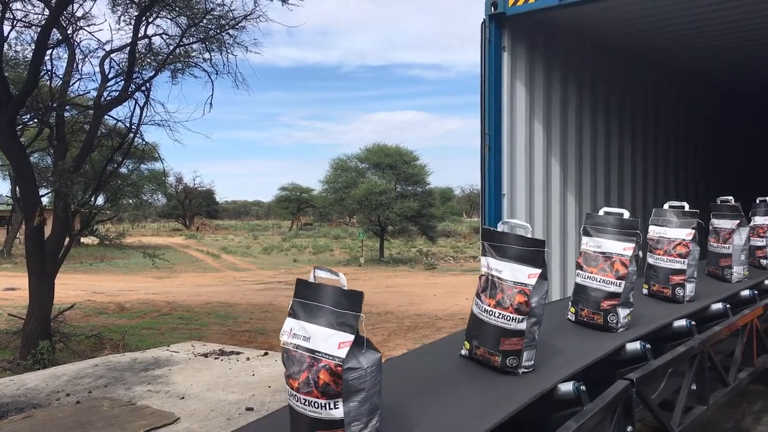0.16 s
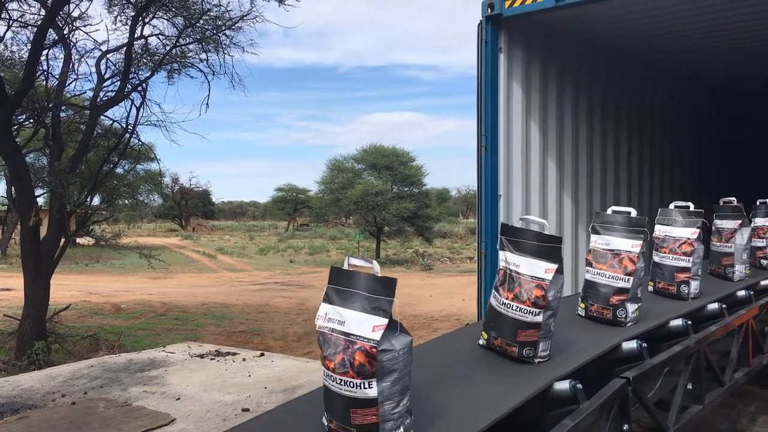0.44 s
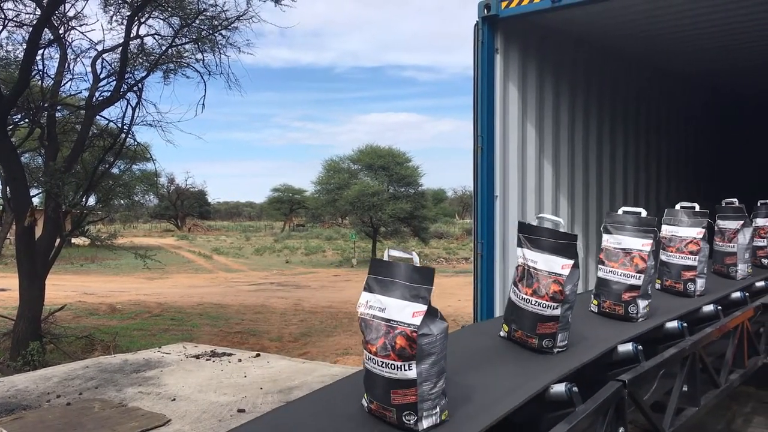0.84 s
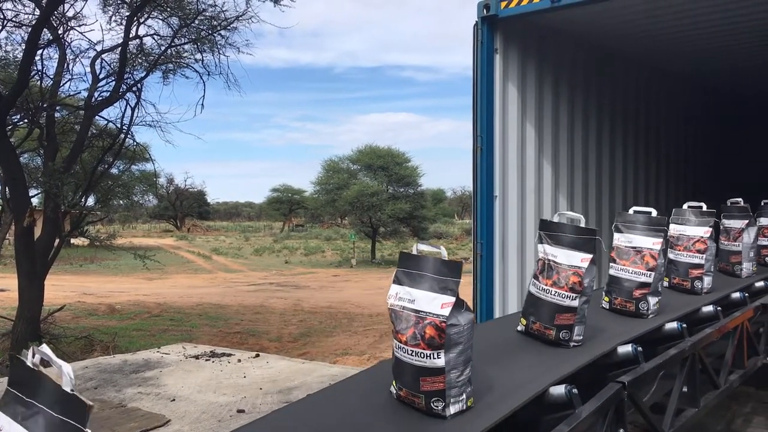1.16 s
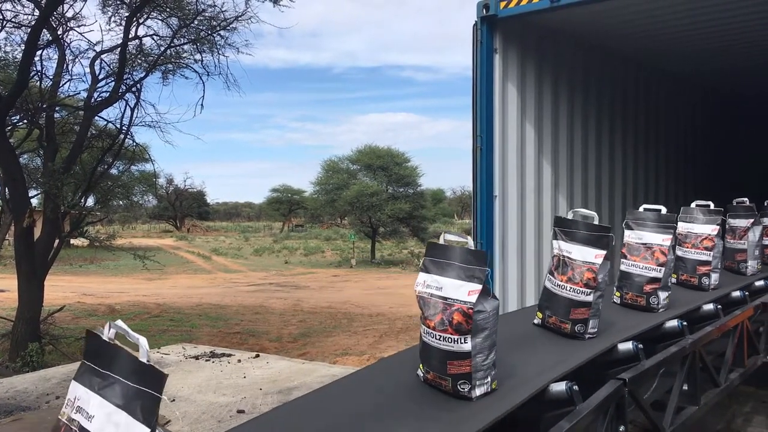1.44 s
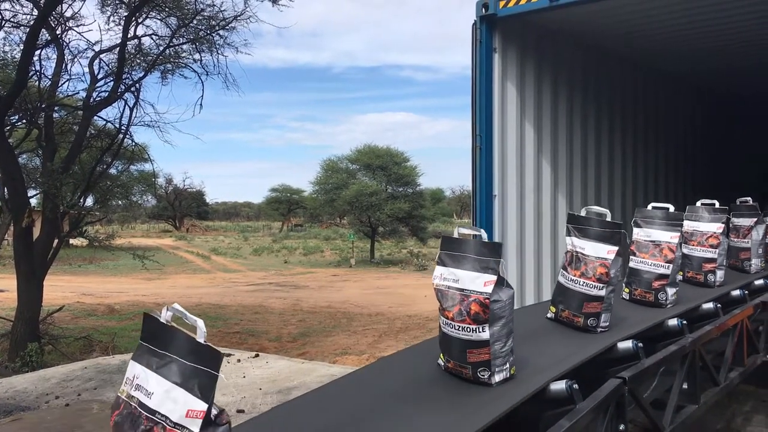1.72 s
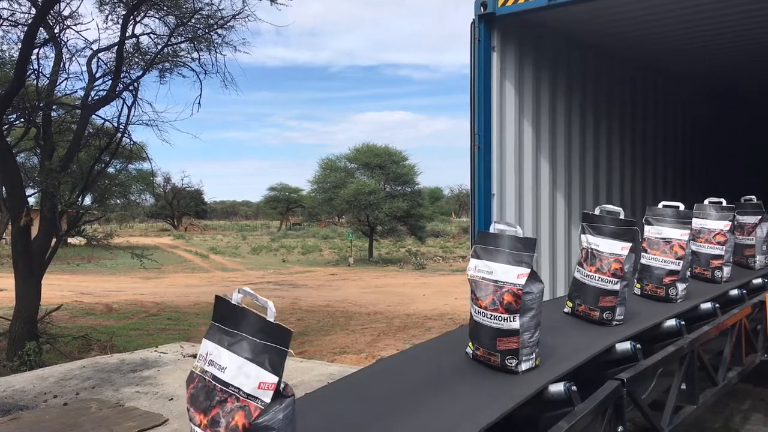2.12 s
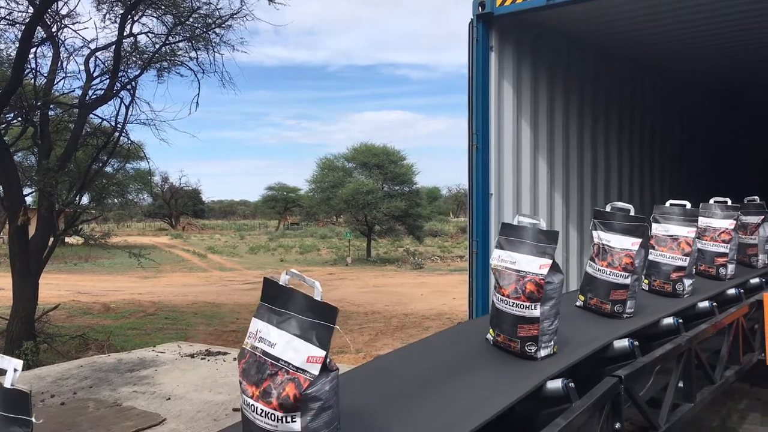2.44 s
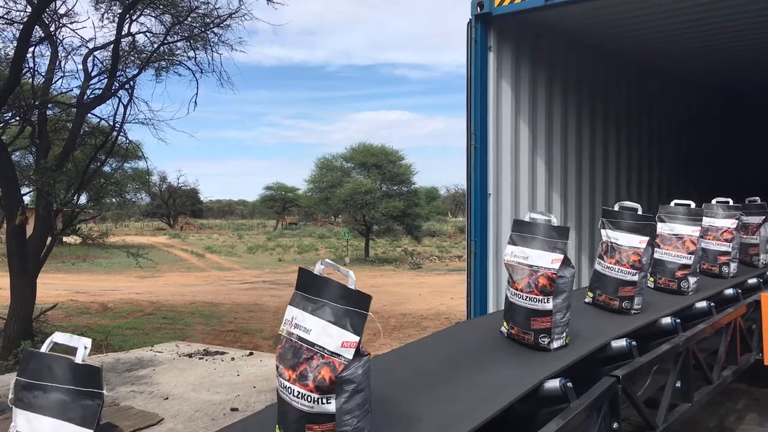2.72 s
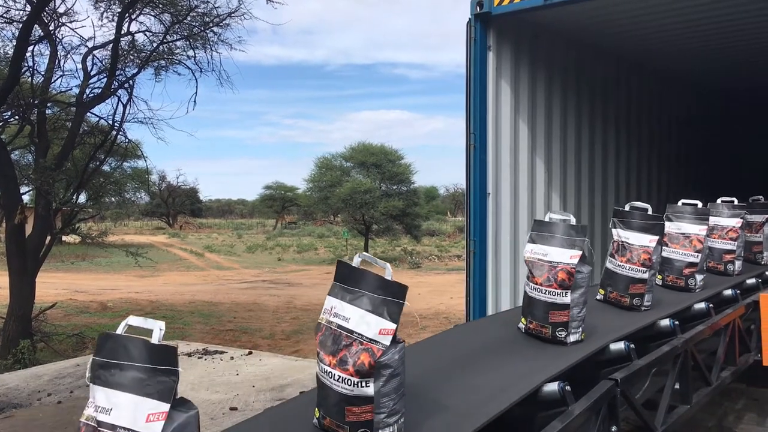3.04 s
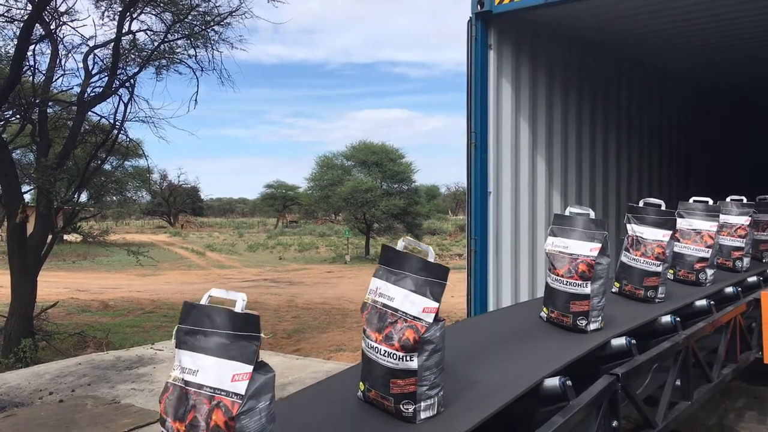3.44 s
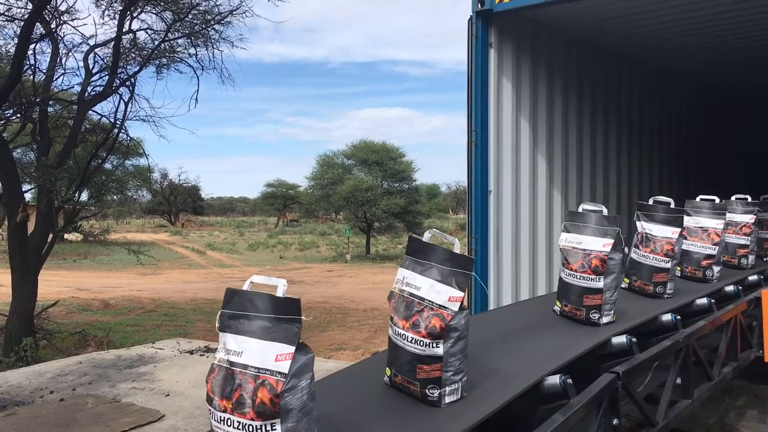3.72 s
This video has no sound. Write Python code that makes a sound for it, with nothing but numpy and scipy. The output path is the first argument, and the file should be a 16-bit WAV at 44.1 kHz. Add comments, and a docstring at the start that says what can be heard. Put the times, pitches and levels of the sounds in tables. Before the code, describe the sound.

A conveyor belt runs outdoors with a steady motor hum and roller rumble, heard from close beside it. Paper sacks of charcoal repeatedly rustle, crunch and knock on the belt, scraping along near the start and again near the end.

```python
"""Charcoal sacks on a conveyor

A belt carries paper sacks of charcoal at the mouth of a steel shipping container, outdoors.
Its motor hums and buzzes at twice the mains rate over the rumble of belt and rollers,
and one roller rubs on every turn. Sacks land, rustle and crunch with a short ring of the
container, knock on the belt, and twice scrape along."""
import sys
import numpy as np
from scipy import signal
from scipy.fft import rfft, irfft
from scipy.io import wavfile

SR = 44100
rng = np.random.default_rng(int(sys.argv[2]) if len(sys.argv) > 2 else 0)


def wrap_up_sound(samples):
    """Save the sound to the file named by the first command line argument, as 16-bit audio."""
    columns = np.atleast_2d(samples).T
    # keep every value between -1 and 1, then stretch to whole-number steps
    tamed = np.clip(columns, -1, 1)
    steps = np.round(tamed * 32767).astype(np.int16)
    wavfile.write(sys.argv[1], SR, steps)


N = 170667
TIME = np.arange(N) / SR


def from_db(db):
    """Turn decibels into a factor to multiply a sound by."""
    return 10 ** (np.asarray(db) / 20)


def rms_one(x):
    """Scale a signal so that its average strength (rms) is 1."""
    return x / np.sqrt(np.mean(x ** 2) + 1e-20)


def colour(x, spectrum):
    """Shape a noise's tone by rows of f/Hz, relative level/dB; the result has strength 1."""
    hz, db = np.transpose(spectrum)
    bins = np.maximum(np.fft.rfftfreq(N, 1 / SR), 1)
    gain = from_db(np.interp(np.log(bins), np.log(hz), db))
    return rms_one(irfft(rfft(x) * gain, N))


def drift(rate_hz):
    """A random wander of typical size 1, mostly slower than rate_hz."""
    step, warm_up = 40, 2000  # samples per point, points thrown away
    r = np.exp(-2 * np.pi * rate_hz * step / SR)
    noise = rng.standard_normal(N // step + warm_up + 2)
    slow = signal.lfilter([1], [1, -2 * r, r * r], noise)[warm_up:]
    return np.interp(np.arange(N) / step, np.arange(len(slow)), rms_one(slow))


def resonate(x, hz, width_hz):
    """Keep a band around one pitch, filtering twice for steep edges; the result has strength 1."""
    r = np.exp(-np.pi * 1.5 * width_hz / SR)
    section = [1, 0, -1, 1, -2 * r * np.cos(2 * np.pi * hz / SR), r * r]
    return rms_one(signal.sosfilt([section, section], x))


def swell(start, rise, fade):
    """Rise straight to 1, then die away by 60 dB every `fade` seconds."""
    age = TIME - start
    return np.clip(age / rise, 0, 1) * np.exp(-np.log(1000) * np.maximum(age - rise, 0) / fade)


def grains(snaps_per_s=6000, spread_db=2.5, echo_fade_s=0.17, echo_db=-4.5):
    """A gritty noise: many tiny snaps of uneven size, blurred by echoes from the steel walls."""
    sizes = from_db(spread_db * np.minimum(rng.exponential(1, N), 5)) * rng.choice([-1, 1], N)
    snaps = sizes * (rng.random(N) < snaps_per_s / SR)
    tail = rng.standard_normal(N) * np.exp(-np.log(1000) * TIME / echo_fade_s)
    echoes = irfft(rfft(snaps) * rfft(tail / np.linalg.norm(tail)), N)
    wash = from_db(-2.5) * rng.standard_normal(N)  # snaps too small to tell apart
    return rms_one(snaps + from_db(echo_db) * echoes) + wash


def motor(hum_hz=100.03, throb_depth=0.47):
    """Mains power makes the motor hum and shakes its housing into a buzz once per hum cycle."""
    # tones of the hum: multiple of the hum rate, level/dB
    hum_tones = [(.5, -68), (1, -36.5), (2, -49.5), (3, -57)]
    # bands where the housing rings: f/Hz, width/Hz, level/dB
    housing_bands = [(1477, 300, -54.5), (2047, 290, -53), (3155, 200, -58.5), (5600, 750, -74)]
    phase = 2 * np.pi * hum_hz * TIME + 0.033 * drift(2)
    out = 0
    for multiple, db in hum_tones:
        waver_db = -0.1 if multiple == 1 else 1.7  # the main tone is nearly steady
        out += np.sqrt(2) * from_db(db + waver_db * drift(2.3)) * np.cos(multiple * phase)
    throb = 1 + throb_depth * np.sin(phase)
    for hz, width_hz, db in housing_bands:
        gain = from_db(db + 2.0 * drift(6.8))
        out += gain * resonate(throb * rng.standard_normal(N), hz, width_hz)
    return out


def belt(rumble_db=-42, rollers_db=-45.5, flutter_db=1.36):
    """The running belt rumbles, and the rollers turning under it make a fluttering rush."""
    # tone of the belt's rumble: f/Hz, relative level/dB
    rumble_spectrum = [(20, -46), (32, -21), (40, -19), (50, 8), (70, -2.5), (95, 3.5), (125, -6),
                       (200, -7), (290, -9), (400, -21), (800, -41.5)]
    # tone of the rollers: f/Hz, relative level/dB
    roller_spectrum = [(150, -0.5), (390, 0.5), (480, 1), (700, 0), (950, 0.5), (1150, -1), (2200, -1.5),
                       (2700, -5), (4000, -9.5), (6200, -13), (8000, -20), (9600, -20.5), (12500, -26),
                       (16000, -39)]
    rumble = from_db(rumble_db) * colour(rng.standard_normal(N), rumble_spectrum)
    rush = from_db(rollers_db + flutter_db * drift(11.3)) * colour(grains(), roller_spectrum)
    return rumble + rush


def sacks():
    """Each movement of a sack crumples the paper and shifts the charcoal inside."""
    # a sack lands or shifts: start/s, rise/s, rustle level/dB, crunch level/dB, fade/s
    movements = [(0, 0.018, -57, -50.5, 3.7), (0.295, 0.032, -40.5, -37.5, 0.4),
                 (0.414, 0.0087, -39.5, -41.5, .33), (.472, 0.013, -48.5, -54, 1.1),
                 (.645, 0.025, -44, -39.5, 0.78), (.776, .011, -39, -39.5, .32),
                 (.857, 0.012, -44.5, -42.5, 0.34), (1.048, 0.014, -50.5, -74, .3),
                 (1.122, 0.017, -37.5, -37.5, 0.24), (1.168, 0.026, -43.5, -40, 0.28),
                 (1.42, 0.11, -49.5, -46, 0.97), (1.665, 0.0047, -50, -66, 0.41),
                 (1.778, .008, -50, -47, 0.22), (1.902, 0.012, -49.5, -42.5, 0.64),
                 (1.962, .007, -41, -42.5, 0.37), (1.984, 0.018, -39.5, -38, 0.29),
                 (2.22, 0.071, -44.5, -42.5, 0.57), (2.282, 0.02, -41, -38.5, 0.3),
                 (2.35, 0.023, -51, -41, 0.17), (2.48, 0.027, -54.5, -48.5, 0.68),
                 (2.582, 0.011, -52, -49, 2.4), (2.75, 0.014, -38.5, -37, 0.29),
                 (3.025, .009, -48, -60, 0.18), (3.11, .015, -39.5, -38.5, 0.35),
                 (3.338, 0.051, -43.5, -36, 0.4), (3.42, 0.022, -41, -37.5, 0.22),
                 (3.697, .01, -43.5, -38.5, 0.63), (3.797, .01, -39, -37.5, 0.24)]
    # tone of rustling paper: f/Hz, relative level/dB
    paper_spectrum = [(800, -22), (2500, -7), (3600, 2), (6200, 3), (8000, -2.5), (9600, 0), (12500, -2.5),
                      (16000, -7.5)]
    # tone of crunching charcoal: f/Hz, relative level/dB
    charcoal_spectrum = [(70, -1), (180, -11), (320, 0), (480, 0.5), (1400, -0.5), (2200, -1.5), (2800, -7),
                         (4000, -11), (7000, -36), (16000, -47)]
    paper_power, charcoal_power = 0, 0
    for start, rise, rustle_db, crunch_db, fade in movements:
        shape = swell(start, rise, fade)
        paper_power += (from_db(rustle_db) * shape) ** 2
        charcoal_power += (from_db(crunch_db) * shape) ** 2
    rustle = np.sqrt(paper_power) * colour(grains(), paper_spectrum)
    crunch = np.sqrt(charcoal_power) * colour(grains(), charcoal_spectrum)
    return rustle + crunch


def roller_rub(first_s=0.04, turn_s=0.13, half_length_s=0.012, scatter_db=2.8):
    """One roller rubs once a turn, giving a short gritty chirp each time."""
    # strength of the rubbing: t/s, level/dB
    rub_levels = [(0, -59), (1.7, -55), (2.1, -46.5), (2.4, -45.5), (2.9, -46), (3.2, -62), (3.87, -57)]
    times = np.arange(first_s, N / SR, turn_s)
    rub_db = np.interp(times, *np.transpose(rub_levels)) + scatter_db * rng.standard_normal(len(times))
    pressure = 0
    for t, db in zip(times, rub_db):
        pressure += from_db(db) * np.exp(-.5 * ((TIME - t) / half_length_s) ** 2)
    return pressure * resonate(rng.standard_normal(N), hz=2050, width_hz=360)


def scrape():
    """Sacks slide with a gritty, uneven friction that makes belt and frame rasp and groan."""
    # strength of the sliding: t/s, level/dB
    slide_levels = [(0, -51.5), (.36, -47.5), (.53, -38.5), (.63, -39), (.76, -43.5), (.95, -44.5),
                    (1.12, -44), (1.3, -70), (3.2, -50), (3.345, -44.5), (3.41, -43), (3.54, -36.5),
                    (3.72, -39.5), (3.87, -40.5)]
    # tone of the sliding: f/Hz, relative level/dB
    slide_spectrum = [(100, -16), (200, 3), (300, 0), (450, -1), (700, -1.5), (1500, -2.5), (2250, -0.5),
                      (2750, -7.5), (3800, -9.5), (6200, -15.5), (8000, -22.5), (10000, -25.5),
                      (16000, -34)]
    # rasps and groans: start/s, rise/s, fade/s, f/Hz, width/Hz, level/dB
    rasps = [(.41, 0.013, 0.31, 2140, 200, -42), (.46, 0.1, 1.4, 3300, 1700, -45),
             (.49, 0.048, 1.06, 201, 129, -40.5), (.648, 0.033, 0.23, 860, 1210, -37),
             (3.31, 0.097, 1.3, 201, 182, -40), (3.47, 0.036, .7, 2250, 260, -42),
             (3.49, 0.14, 1.4, 247, 89, -37.5)]
    level_db = np.interp(TIME, *np.transpose(slide_levels)) + .6 * drift(22)
    friction = grains()
    ringing = 0
    for start, rise, fade, hz, width_hz, db in rasps:
        ringing += from_db(db) * swell(start, rise, fade) * resonate(friction, hz, width_hz)
    return from_db(level_db) * colour(grains(), slide_spectrum) + ringing


def knocks(rise_s=0.0017):
    """A sack's weight hits the belt, and belt and frame ring with a few dull, low tones."""
    # blows on the belt: t/s, level/dB
    blows = [(0.674, -35), (0.787, -31.5), (1.128, -32.5), (1.177, -36), (1.514, -35), (1.993, -30.5),
             (2.292, -27), (2.759, -30.5), (3.546, -28), (3.802, -27), (3.843, -35)]
    # natural tones of belt and frame: f/Hz, relative level/dB, fade/s
    frame_tones = [(59.4, -9, 0.25), (154, -1.5, 0.069), (206, -2.5, 0.073), (297, -1.5, 0.057)]
    out = np.zeros(N)
    for start, blow_db in blows:
        age = np.maximum(TIME - start, 0)
        for k, (hz, tone_db, fade) in enumerate(frame_tones):
            gain = from_db(blow_db + tone_db + rng.standard_normal())
            tone = (-1) ** k * np.sin(2 * np.pi * hz * age)  # every other tone starts downward
            out += gain * swell(start, rise_s, fade) * tone
    return out


def scene():
    """All the sounds together in one channel, heard from beside the belt."""
    return (motor() + belt() + sacks() + scrape() + knocks() + roller_rub())[None]


def record(dry, cutoff_hz=15800):
    """The microphone softens three narrow bands of treble, and the very top is cut off."""
    # dips in the microphone's treble: f/Hz, width/Hz, level/dB
    dips = [(4900, 260, -4.5), (7740, 290, -3), (10480, 260, -3.5)]
    bins = np.fft.rfftfreq(N, 1 / SR)
    dips_db = sum(db * np.exp(-.5 * ((bins - hz) / width_hz) ** 2) for hz, width_hz, db in dips)
    low_pass = 1 / np.sqrt(1 + (bins / cutoff_hz) ** 400)
    return irfft(rfft(dry) * from_db(dips_db) * low_pass, N)


dry = scene()
out = record(dry)
wrap_up_sound(out)
```